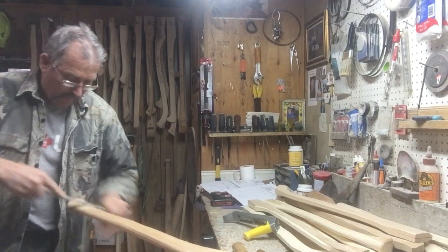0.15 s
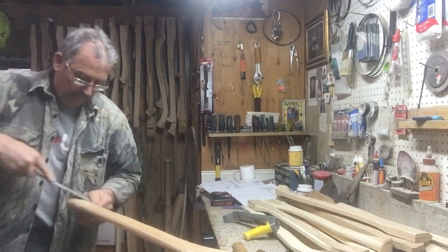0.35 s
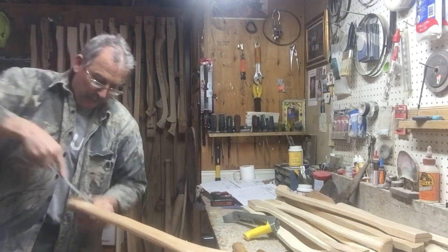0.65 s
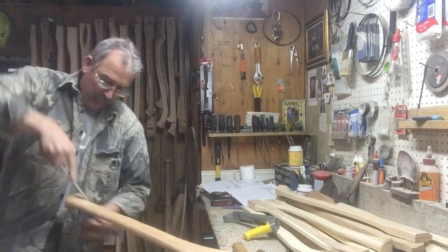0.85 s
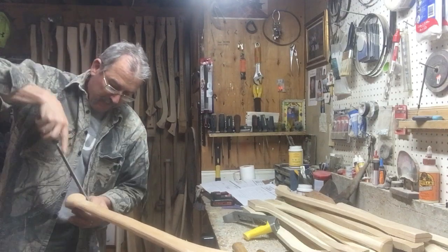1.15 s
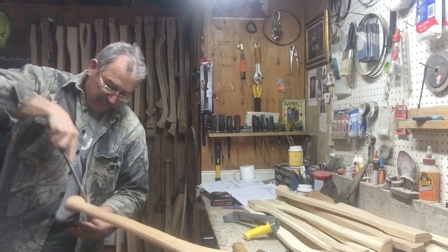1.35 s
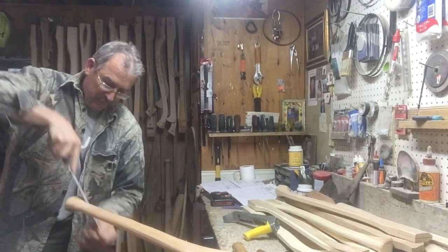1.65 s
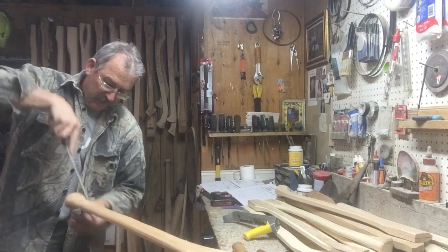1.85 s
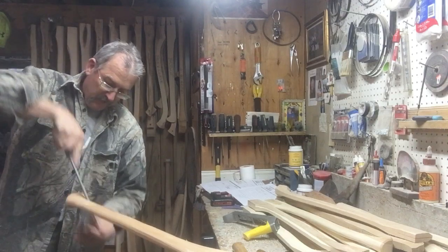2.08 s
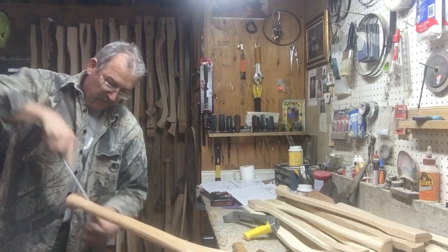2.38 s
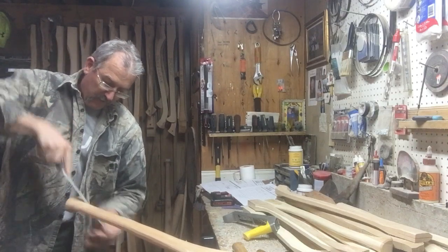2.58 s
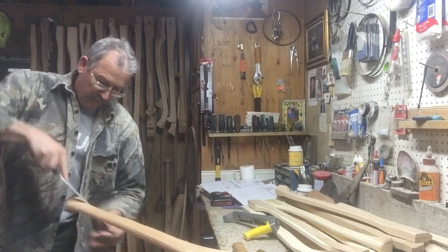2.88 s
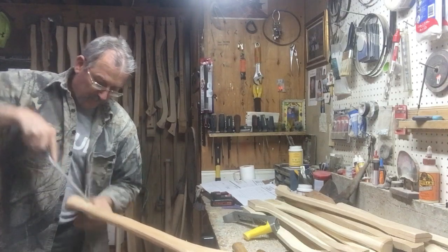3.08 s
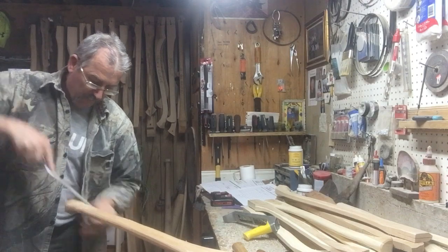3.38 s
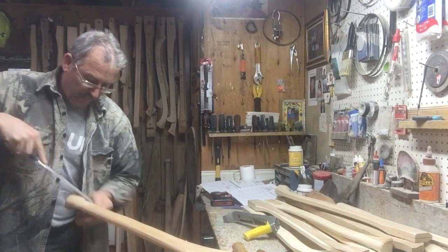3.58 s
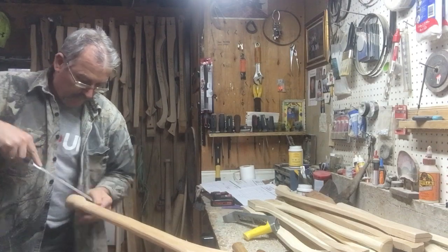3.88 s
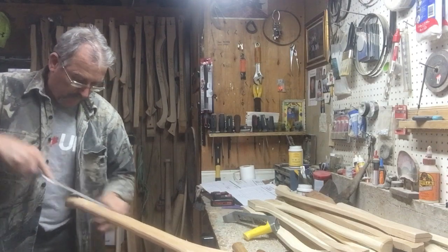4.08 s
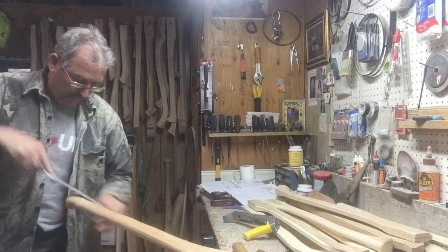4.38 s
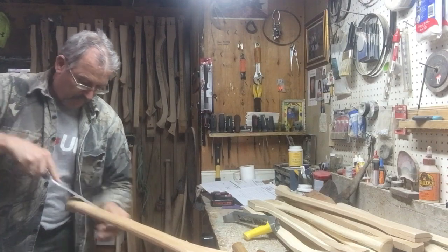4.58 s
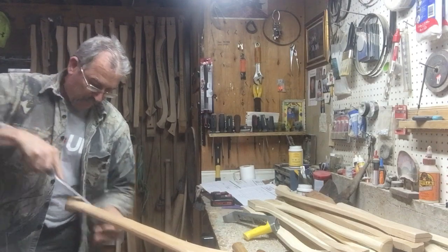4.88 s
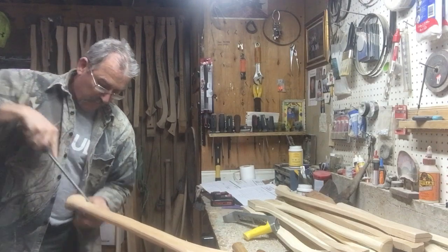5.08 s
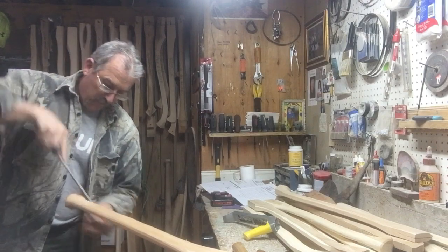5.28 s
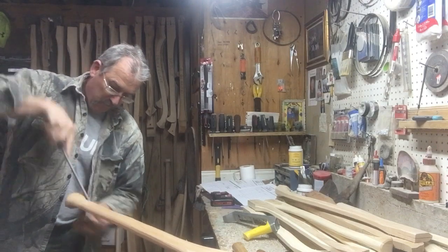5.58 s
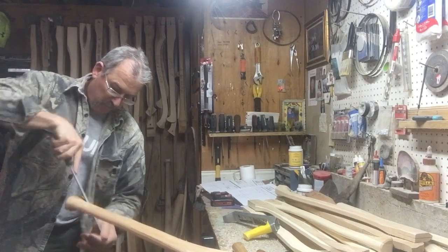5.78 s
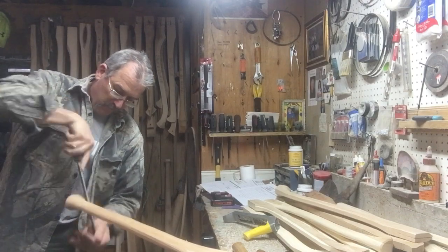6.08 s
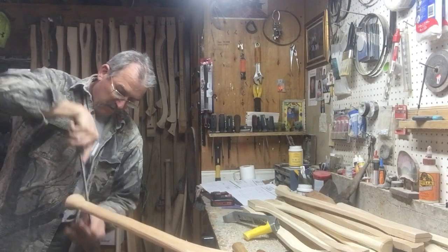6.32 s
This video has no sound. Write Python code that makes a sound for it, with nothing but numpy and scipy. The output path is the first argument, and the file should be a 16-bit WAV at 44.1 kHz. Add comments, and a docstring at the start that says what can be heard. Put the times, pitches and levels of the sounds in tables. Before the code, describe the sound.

Rapid two-way filing of a long wooden handle, scratchy bright pushes and hollow, low buzzing draws, with faint bench rumble and quiet room air.

```python
"""A coarse steel file is drawn back and pushed in turn over the end of a long wooden handle in a small workshop.
Strokes begin with the file flat; after a gap around 1.2 s it is lifted and the colour changes.
On each draw the teeth skip, locked to the bending handle (booming); on each push they tear fibres (hissing).
Noise and skip pulses drive resonances of wood and steel; sudden catches and a few bright ticks stand out.
Throughout, low noise shakes the bench under the strokes, sparse echoes follow, and the shop air hushes faintly."""
import sys
import numpy as np
from scipy import signal
from scipy.fft import rfft, irfft
from scipy.io import wavfile
from scipy.ndimage import uniform_filter1d

SR = 44100
rng = np.random.default_rng(int(sys.argv[2]) if len(sys.argv) > 2 else 0)


def unload_wav(signal):
    """Save mono or channel-first audio to the path in sys.argv[1] as 16-bit WAV at rate SR, clipped to [-1, 1]."""
    wavfile.write(
        sys.argv[1],
        SR,
        np.round(np.clip(np.atleast_2d(signal).T, -1, 1) * 32767).astype(np.int16),
    )


N = 284445

LIFT_S = 1.2  # the file lies flat before this

# draw strokes: start_s, length_s, bite_db, lean_db (early to late), handle_flex_db, skip_hz
DRAW_STROKES = [(0.0, 0.11, -37.5, -6.5, -50.5, 311), (0.257, 0.13, -41, -6, -54, 314),
                (0.536, 0.11, -36.5, 1.5, -50.5, 318.3), (0.852, 0.13, -39, -2.5, -40, 269),
                (1.5, 0.11, -54.5, 3, -49.5, 267.8), (1.785, 0.16, -42.5, 0, -44.5, 287.6),
                (2.1, 0.13, -42.5, 0, -48, 275), (2.415, 0.093, -38.5, -4, -39.5, 263),
                (2.722, 0.083, -39, -13.5, -40, 279.4), (2.973, 0.13, -40.5, 4.5, -45, 260.3),
                (3.246, 0.1, -36.5, 8.5, -41.5, 259.3), (3.533, 0.11, -35, 1.5, -36.5, 280.8),
                (3.809, 0.11, -35.5, 0, -35.5, 280.2), (4.117, 0.11, -35.5, -6.5, -39.5, 283.5),
                (4.381, 0.1195, -42, 6, -43, 303.2), (4.678, 0.12, -41.5, 8.5, -46.5, 305.1),
                (4.975, 0.12, -47, 8.5, -48.5, 260.3), (5.267, 0.1, -47.5, 16, -51.5, 260.2),
                (5.56, 0.1, -50.5, 16.5, -45.5, 308.2), (5.865, 0.095, -46, -4.5, -46, 303.6),
                (6.162, 0.1, -44, 12.5, -43.5, 300.6)]


def amp(db):
    """Amplitude ratio of a level in dB."""
    return 10 ** (np.asarray(db) / 20)


def evened(x):
    """Scales x to rms 1."""
    return x / np.sqrt(np.mean(x ** 2) + 1e-20)


def read(points, hz):
    """Interpolates (hz, value) points along log frequency."""
    point_hz, value = np.transpose(points)
    return np.interp(np.log(hz + 1), np.log(point_hz + 1), value)


def coloured(x, points):
    """Filters x by a gain curve of (hz, db) points, without phase shift."""
    gain = amp(read(points, np.fft.rfftfreq(N, 1 / SR)))
    return irfft(rfft(x) * gain, N)


def wander(hz):
    """Slow random signal of rms 1: noise low-passed at hz."""
    step = 64  # samples
    low_pass = signal.butter(2, hz, fs=SR / step, output="sos")
    slow = signal.sosfiltfilt(low_pass, rng.standard_normal(N // step + 802))[400:-400]
    return np.interp(np.arange(N) / step, np.arange(len(slow)), evened(slow))


def air():
    """Steady hush of the shop: coloured noise, wavering a little."""
    # shop air spectrum: freq_hz, relative_level_db (per Hz)
    spectrum = [(12, -47), (20, -21), (80, -12), (97, -7), (119, -2.5), (161, -22.5), (274, -14.5),
                (464, -22.5), (959, -26.5), (1520, -32.5), (2580, -35), (3830, -44), (4980, -58.5),
                (6500, -50.5), (10300, -64.5), (13500, -56), (15700, -74)]
    level = amp(-52.5 + 0.44 * wander(22))
    return level * evened(coloured(rng.standard_normal(N), spectrum))


def shop(x):
    """Sparse echoes of random sign, each band dying at its own speed."""
    # decay of the shop: freq_hz, t60_s
    decay = [(200, 0.15), (1000, 0.22), (8000, 0.11)]
    size, spacing = SR // 2, 20  # samples
    taps = np.zeros(size)
    at = np.arange(200, size - 20, spacing) + rng.integers(0, spacing, (size - 201) // spacing)
    taps[at] = rng.choice([-1., 1.], len(at))
    hz, t, bands = signal.stft(taps, SR, nperseg=256)
    t60_s = read(decay, hz)[:, None]
    tail = signal.istft(bands * amp(-60 * t / t60_s), SR, nperseg=256)[1]
    return signal.fftconvolve(x, tail / np.linalg.norm(tail))[:N]


def swell(layer, edge, lag_s=0.):
    """Level of one layer: a half-sine arch to the power edge for each stroke, leaning from early to late."""
    # push strokes: start_s, length_s, bite_db, lean_db (early to late), handle_flex_db
    push_strokes = [(0.125, 0.1, -33, -2, -59), (0.39, 0.13, -34.5, -1.5, -58.5),
                    (0.674, 0.14, -34.5, -10, -50.5), (1.333, 0.12, -40, -15.5, -45),
                    (1.635, 0.12, -39.5, -0.5, -52), (1.945, 0.13, -38, -2, -52.5),
                    (2.244, 0.12, -39, 0.5, -51), (2.528, 0.15, -41.5, -5, -50),
                    (2.821, 0.11, -37.5, 3, -58), (3.106, 0.11, -38, 0, -50), (3.387, 0.099, -36, 2, -50),
                    (3.667, 0.13, -40, -13, -54), (3.939, 0.12, -37.5, 0, -48.5),
                    (4.236, 0.11, -37, 2.5, -51), (4.51, 0.14, -39, -3.5, -53),
                    (4.818, 0.14, -40, -7.5, -57.5), (5.11, 0.14, -40.5, -1.5, -56),
                    (5.388, 0.14, -41.5, 5.5, -59), (5.673, 0.17, -43, -3, -58.5),
                    (5.996, 0.13, -39.5, -11, -47.5), (6.283, 0.2, -46.5, -17.5, -54)]
    # response by layer and stroke kind: over_bite_db, flex_share, lean_share, own_lean_db, flat_file_db
    answer = {"bite": {"push": (0, 0, 1, 0, 0),
              "draw": (0, 0, 1, 0, 0)}, "bend": {"push": (0.3, 1, .6, 0.5, 0.3),
              "draw": (0.3, 1, .2, -0.7, 0.3)}, "body": {"push": (1.2, .3, .9, -1.5, -3.5),
              "draw": (3.5, .7, .4, 3, -0.7)}, "hiss": {"push": (-27, 0, 1.1, 0.7, -3),
              "draw": (-33, 0, .9, -3, 1.5)}}
    level = np.full(N, amp(-94.0))
    for kind, strokes in (("push", push_strokes), ("draw", DRAW_STROKES)):
        over_db, flex_share, lean_share, own_lean_db, flat_db = answer[layer][kind]
        for start_s, length_s, bite_db, lean_db, handle_db, *_ in strokes:
            first = round((start_s + lag_s) * SR)
            last = min(round((start_s + lag_s + length_s) * SR), N)
            part = np.linspace(0, 1, last - first)
            db = bite_db + over_db + flex_share * (handle_db - bite_db)
            db += flat_db * (start_s < LIFT_S)
            db += (lean_share * lean_db + own_lean_db) * np.clip(2 * part - 1, -.5, .5)
            level[first:last] += amp(db) * np.sin(np.pi * part).clip(0) ** edge
    # the file stays on the wood at the turns
    return level + 0.26 * uniform_filter1d(level, size=4000, origin=1500)


def bench():
    """Bench trembling: low noise that follows the smoothed work of the teeth, with heavier jolts."""
    # tremble spectrum: freq_hz, relative_level_db (per Hz)
    spectrum = [(12, -57), (20, -24), (40, -6.5), (59, 4), (140, -11), (162, -7), (200, -19), (260, -51),
                (440, -120)]
    # heavier jolts: time_s, level_db
    jolts = [(0.78, -37.5), (1.38, -48.5), (2.48, -49), (2.77, -49), (3.05, -53), (4.44, -50), (4.92, -49),
             (5.51, -54), (6.11, -51)]
    shake_db, shake_power, smooth_s = -50, 0.3, 0.17
    usual_bite_db = -42
    jolt_half_width_s = 0.036  # to 1/e
    work = uniform_filter1d(swell("bite", edge=0.98), size=round(smooth_s * SR))
    level = amp(shake_db) * (work / amp(usual_bite_db)) ** shake_power
    t = np.arange(N) / SR
    for at_s, db in jolts:
        level += amp(db) * np.exp(-((t - at_s) / jolt_half_width_s) ** 2)
    return level * evened(coloured(rng.standard_normal(N), spectrum))


def ticks():
    """Steel touching wood: coloured noise bursts decaying in a few milliseconds."""
    # contacts: time_s, relative_level_db
    contacts = [(1.1278, -46), (1.504, -35), (6.17, -39)]
    # tick spectrum: freq_hz, gain_db
    spectrum = [(1500, -27), (2600, 5.5), (4000, -21), (5000, -27), (6500, -20), (10000, -40), (15000, -36)]
    decay_s = 0.0027
    hits = np.zeros(N)
    for at_s, db in contacts:
        hits[round(at_s * SR)] = amp(db + 3.0)
    envelope = signal.lfilter([1], [1, -np.exp(-1 / (decay_s * SR))], hits)
    return coloured(rng.standard_normal(N) * envelope, spectrum)


def ring(drive, modes, push, place_db):
    """Two-pole modes of even noise gain; the moving contact point feeds each of them unevenly."""
    out = np.zeros(N)
    for k, (hz, width_hz, db, push_db) in enumerate(modes):
        radius = np.exp(-np.pi * width_hz / SR)
        poles = [1, -2 * radius * np.cos(2 * np.pi * hz / SR), radius ** 2]
        fed = drive * amp(db + push_db * push + place_db * wander(9.0))
        out += (-1) ** k * np.sqrt(1 - radius) * signal.lfilter([1, 0, -1], poles, fed)
    return out


def teeth(lock):
    """Force of the teeth: random tears, and regular skips where the file locks to the handle."""
    tears_per_s, skip_glide_hz = 4000., 16  # skips quicken through a draw
    sizes = amp(3.52 * np.minimum(rng.exponential(1, N), 5))
    tears = sizes * rng.choice([-1., 1.], N) * (rng.random(N) < tears_per_s / SR)
    tears = evened(evened(tears) * amp(1.53 * wander(60)))  # tears come in clumps

    glide = [(start_s + end * length_s, hz + (end - .5) * skip_glide_hz)
             for start_s, length_s, *_, hz in DRAW_STROKES for end in (0, 1)]
    skip_hz = np.interp(np.arange(N) / SR, *np.transpose(glide))
    turns = np.cumsum(skip_hz * (1 + .02 * wander(40))) / SR
    skips = np.diff(np.floor(turns), prepend=0) * amp(3.8 * wander(140))
    skips = evened(skips - skips.mean())
    swing = np.sqrt(2) * np.cos(2 * np.pi * turns)  # the handle swings once for every skip
    return np.sqrt(1 - lock) * tears, np.sqrt(lock) * skips, np.sqrt(lock) * swing


def catches(tears):
    """Teeth catching suddenly: short decaying bursts of tearing."""
    # catches: time_s, relative_level_db
    moments = [(0.412, -34.5), (1.341, -56), (2.136, -28), (2.43, -46), (2.731, -30), (3.015, -31),
               (4.397, -24), (4.684, -42), (5.021, -38), (5.323, -60), (5.57, -35.5), (5.704, -36),
               (5.916, -14), (6.006, -53), (6.198, -22)]
    decay_s = 0.0083
    hits = np.zeros(N)
    for at_s, db in moments:
        hits[round(at_s * SR)] = amp(db - 4.5)
    return tears * signal.lfilter([1], [1, -np.exp(-1 / (decay_s * SR))], hits)


def filing():
    """Teeth drive handle and steel; a bright stroke is a push, a booming one a locked draw."""
    # modes of handle bending, handle body, upper wood and steel file:
    # freq_hz, width_hz, relative_level_db, push_db (added at push = 1, taken off at push = -1)
    bending_modes = [(240.7, 75, -1.5, -2.5), (269.3, 37, 4, -5.5), (320.3, 15.6, 1.5, -2.5),
                     (346, 72, 3.5, 11.5), (442, 88, -8, 4.5)]
    body_modes = [(598, 53, -14, -7), (652.4, 21, -8.5, 1.5), (741.8, 28.6, 2, -1.5),
                  (794.6, 42, -1.5, 0.5), (842, 58, -8, -4), (931, 85, -2.5, 0), (1021.3, 44, -1, 8.5),
                  (1143, 17, -12.5, -5), (1283, 77, -7.5, 1.5), (1450, 37, -6, -0.5)]
    upper_modes = [(1470, 54, -12, 2), (1711, 34, -8.5, 1), (1758, 61, -7, 4), (1851.2, 36.5, 0, -1.5),
                   (2158, 14.7, -6, -3), (2309, 54, -3.5, -2.5), (2350, 55, -0.5, 2.5),
                   (2587, 80, -5.5, 3.5), (2664, 52, -6.5, 0.5), (2681, 62, -8.5, -1.5), (3018, 71, -16, 7),
                   (3305, 50, -17, 5), (3582, 160, -21.5, -0.5), (4032, 88, -21, 4.5)]
    steel_modes = [(4726, 23, -6, 3.5), (6040, 210, -3.5, -6), (6290, 50, -3.5, -1), (7005, 88, 2, 0.5),
                   (7950, 58, -10, 2), (8800, 98, -4, 3), (9700, 110, -12, 15.5)]
    # broad sound of tearing fibres: freq_hz, relative_level_db (per Hz)
    scratch = [(180, -34), (300, -4.5), (517, -17.5), (742, -28), (1040, -1.5), (1630, -6.5), (2400, -18),
               (3000, -18.5), (3830, -23), (5000, -64.5), (8000, -86)]
    # dust and teeth sliding: freq_hz, relative_level_db (per Hz)
    hiss_spectrum = [(3000, -26.5), (4300, -21.5), (5200, -8), (6500, -4.5), (7400, -13.5), (9500, -9.5),
                     (10300, -15.5), (12500, -17), (15700, -30)]
    # wood radiates little treble: freq_hz, gain_db
    wood_loss = [(2800, 0), (4500, -5.5), (6000, -34), (12000, -45)]
    # colour while the file lies flat: freq_hz, gain_db
    flat_colour = [(1200, 0), (1900, 1.5), (2160, -2), (2400, -0.5), (2680, 6), (3500, 2.5), (5000, 5.5),
                   (7000, -1.5)]
    bending_colour = [(170, -27), (240, 0.5), (440, -3.0), (600, -5.0)]  # freq_hz, gain_db
    steel_colour = [(2000, -30), (4500, 2.0), (10000, 3), (11000, -11.5)]

    bite = swell("bite", edge=0.84)
    body = swell("body", edge=0.86)
    hiss = swell("hiss", edge=1.11)
    bend = swell("bend", edge=0.12, lag_s=0.016)
    bend = uniform_filter1d(bend, size=900)  # the heavy handle is slow to answer

    push = np.clip((20 * np.log10(hiss / bite) + 29) / 5, -1, 1)
    boom_db = 20 * np.log10(bend / uniform_filter1d(bite, size=2000))
    tears, skips, swing = teeth(np.clip((boom_db + 5) / 8, 0, .85))
    knocks = catches(tears)

    wood = coloured(ring(amp(-3.0) * bend * tears, bending_modes, push, place_db=1.5), bending_colour)
    wood += ring(amp(-6.5) * (body * (tears + skips) + knocks), body_modes, push, place_db=3.5)
    force = bite * (tears + skips) + 0.44 * knocks
    wood += ring(amp(-6) * force, upper_modes, push, place_db=3.5)
    wood = coloured(wood, wood_loss)
    wood += amp(-1.0) * bend * swing
    wood += amp(6.0) * coloured(force, scratch)

    slide = hiss * (0.45 * tears + 0.47 * rng.standard_normal(N))
    steel = coloured(ring(amp(-6.5) * slide, steel_modes, push, place_db=3.5), steel_colour)
    sound = wood + steel + amp(13.5) * coloured(slide, hiss_spectrum)
    return np.where(np.arange(N) < LIFT_S * SR, coloured(sound, flat_colour), sound)


def scene():
    """Filing and ticks with their echoes, over bench and air."""
    work = filing() + ticks()
    return (work + amp(-9.5) * shop(work) + bench() + air())[None]


def record(dry):
    """Limits the band with a linear-phase low-pass."""
    edge_hz = 15750
    low_pass = signal.firwin(511, edge_hz, window=("kaiser", 9), fs=SR)
    return signal.oaconvolve(dry, low_pass[None], "same")


dry = scene()
out = record(dry)
unload_wav(out)
```